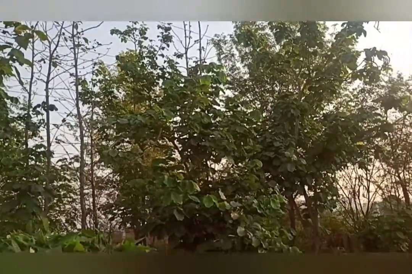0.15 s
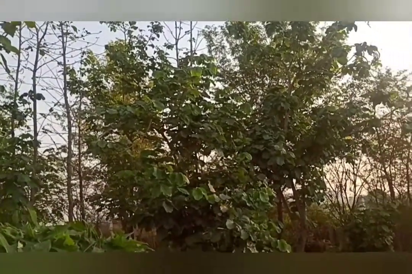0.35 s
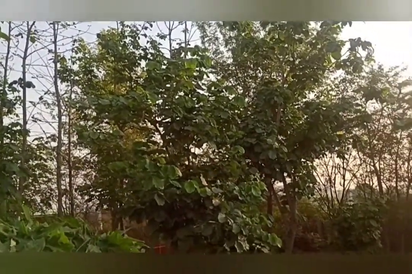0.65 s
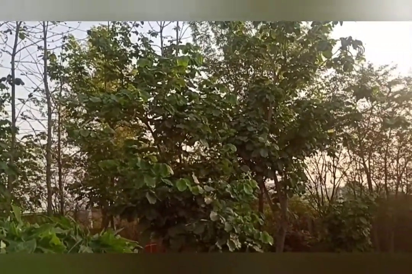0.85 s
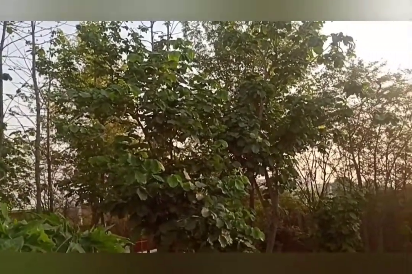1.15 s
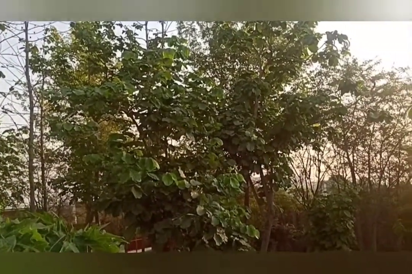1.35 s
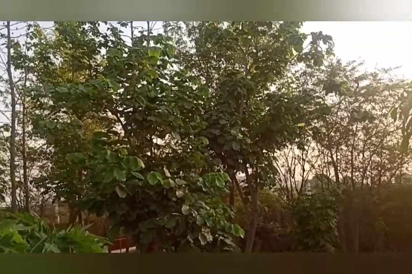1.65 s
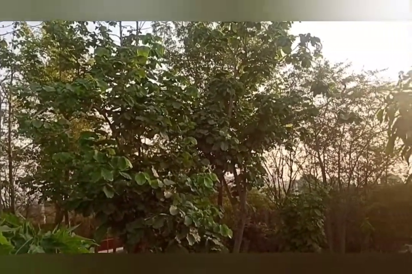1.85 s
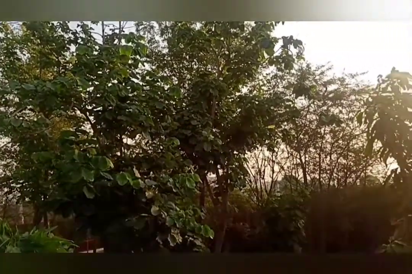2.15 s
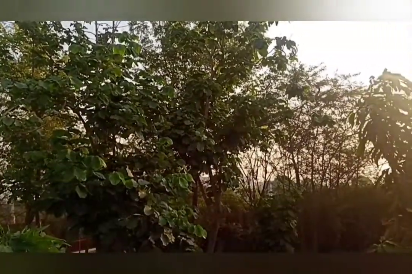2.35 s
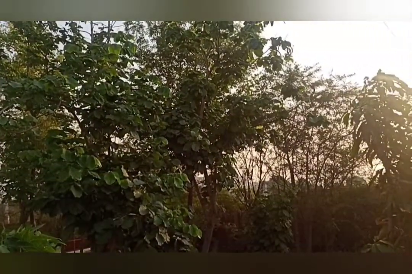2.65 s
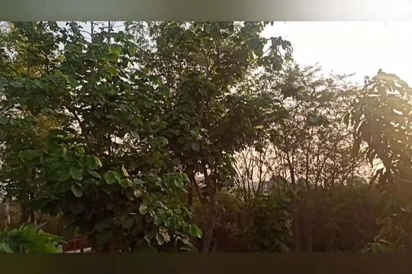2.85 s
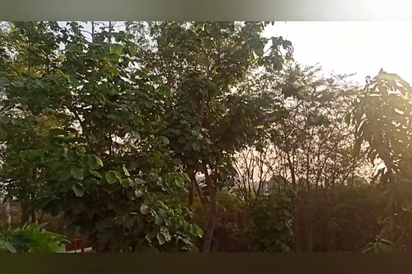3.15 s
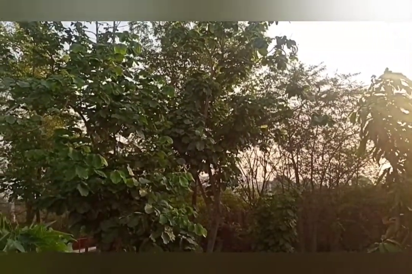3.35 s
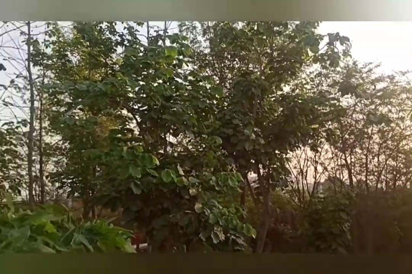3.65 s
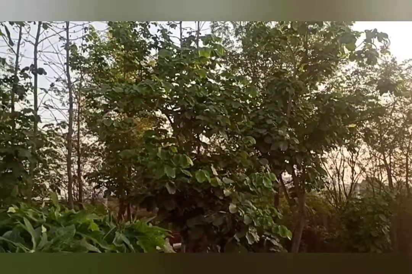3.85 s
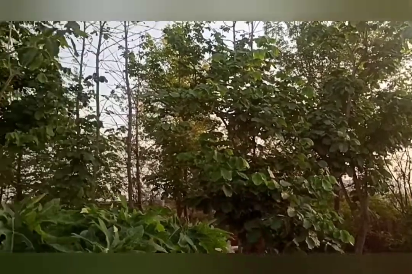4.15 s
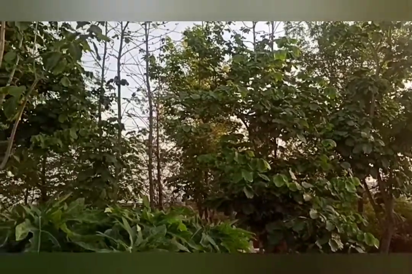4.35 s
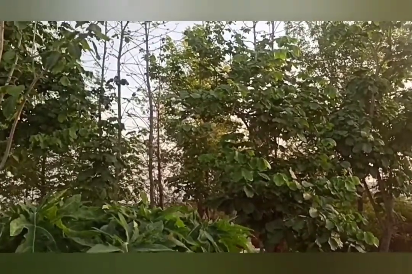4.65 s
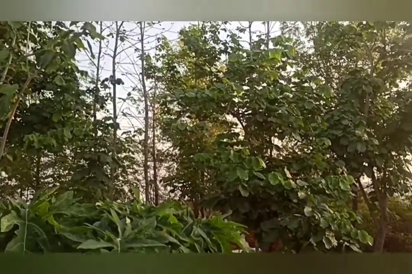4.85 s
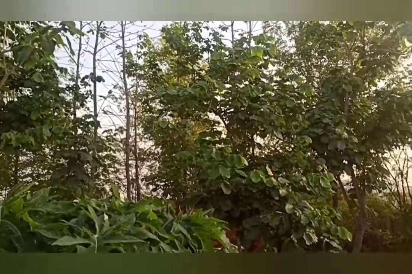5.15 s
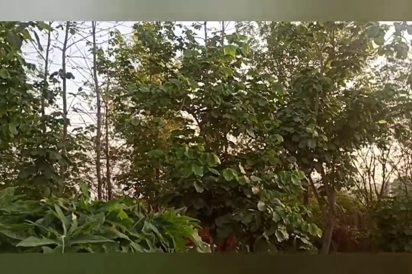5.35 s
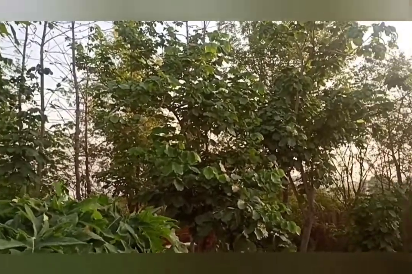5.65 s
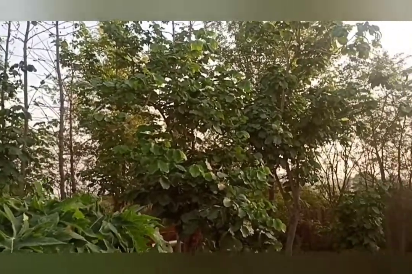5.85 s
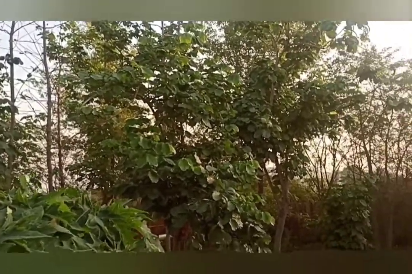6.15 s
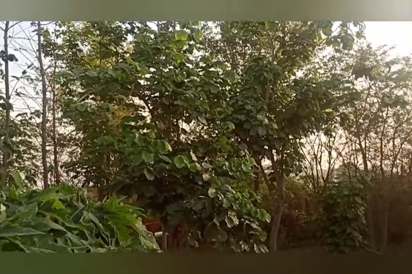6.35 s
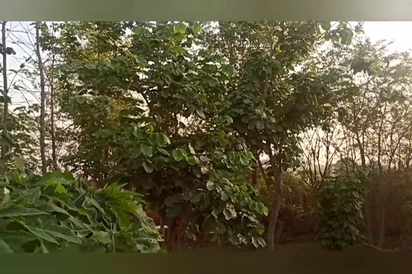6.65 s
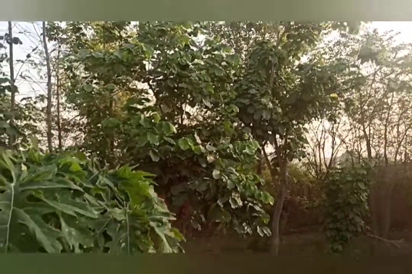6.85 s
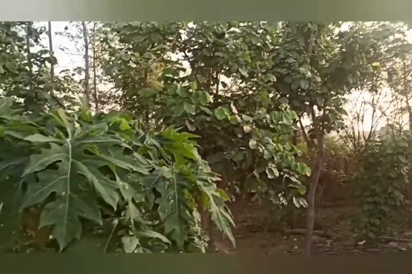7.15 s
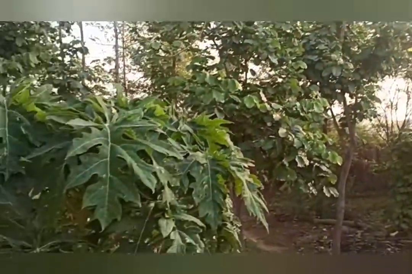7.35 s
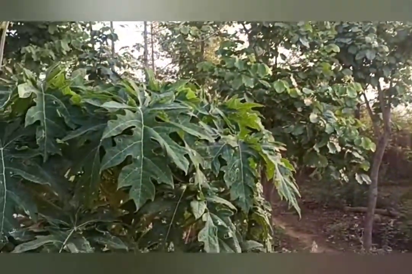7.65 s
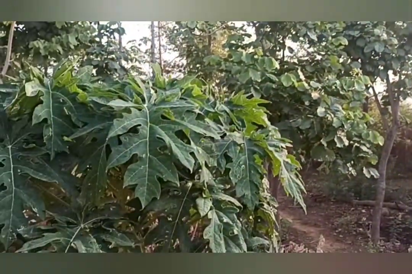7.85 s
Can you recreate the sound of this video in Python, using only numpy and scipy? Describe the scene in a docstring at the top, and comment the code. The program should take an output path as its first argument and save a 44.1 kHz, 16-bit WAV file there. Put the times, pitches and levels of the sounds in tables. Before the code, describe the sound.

A garden among trees is heard in wide stereo, with a light echo on the birds. From the start until about 3 seconds, a flock trades loud, short arched whistles and pips. A lower bird answers with swoops and rolling calls, repeated about three times a second, until nearly 5 seconds. Hoarse birds add raspy, hooked notes from deeper in the trees until about 4 seconds. From 5 to 7.5 seconds it is much quieter: soft far piping, one high falling note at 6 seconds, and distant nasal calls around 6.4 and 7.4 seconds. From 7.6 seconds two louder hoarse calls and a couple of low swoops close the scene. A small bird faintly repeats a thin rising whistle. Light twig clicks come near 1.2 seconds and between 4.4 and 7 seconds. Faint pulsing crickets, a soft rustle and a distant low hum continue underneath.

```python
"""A garden among trees at dusk, heard by two spaced microphones. A loud flock trades arched whistles,
a low-voiced bird answers with rolling calls, hoarse birds call from deeper in the trees and far birds
pipe between them. Each note is a gliding syrinx tone with overtones. Trunks and walls echo the birds
and a few twig clicks, over pulsing crickets and a distant low hum."""
import sys
import numpy as np
from scipy import signal
from scipy.fft import rfft, irfft, next_fast_len
from scipy.io import wavfile
from scipy.ndimage import uniform_filter1d, minimum_filter1d

SR = 44100
rng = np.random.default_rng(int(sys.argv[2]) if len(sys.argv) > 2 else 0)


def dump(signal):
    """Clip the signal to [-1, 1] and save it as 16-bit WAV at the path in sys.argv[1]."""
    limited = np.clip(np.atleast_2d(signal).T, -1, 1)
    pcm = np.round(limited * 32767).astype(np.int16)
    wavfile.write(sys.argv[1], SR, pcm)


N = 352359


def flock():
    """Loud short arches, longer whistles that dip, peak and fall, low pips as after-notes."""
    # Shapes. Each row: share of length, level in dB, pitch ratio.
    arch = [(0, -5.5, .81), (.28, 2.5, .92), (.6, -1, 1.0), (.8, -3, .97), (1, -4.5, .82)]
    dipping_whistle = [(0, -5, 0.93), (.22, 3, 0.82), (.45, -1.5, 1.0), (.72, 1, 0.91), (1, -10, .8)]
    pip = [(0, -7.5, .94), (.5, 1.5, 1.0), (1, -10.5, .91)]
    # Each row: start in s, length in s, level in dB, pan in dB, overtone offset in dB, top pitch in Hz.
    arches = [(-.03, 0.081, -10.5, 5.5, -11, 2256), (.114, 0.046, -6, 4, -22, 2510),
              (.345, 0.053, -8.5, -4.5, -17, 2539), (.59, .058, -9, -2, -17.5, 2612),
              (2.095, 0.041, -14, -7, -12.5, 2333), (2.346, .05, -7.5, 1.5, -21, 2515),
              (2.575, 0.054, -9.5, 0.5, -16.5, 2538), (2.82, 0.056, -11, -4, -16, 2627)]
    dipping_whistles = [(.828, .105, -14.5, -1.5, -16.5, 2354), (1.815, 0.1, -16.5, -3.5, -3, 2579),
                        (3.066, .092, -12, -1.5, -17, 2378)]
    pips = [(.17, 0.034, -13, -8.5, -6.5, 2140), (.225, 0.037, -7, 1.5, -12.5, 2180),
            (.405, 0.04, -8.5, 2, -18, 2201), (.648, 0.039, -12, 0.5, -17, 2180),
            (1.56, 0.039, -16.5, 1.5, -3, 2210), (1.615, 0.04, -12, 1.5, -18.5, 2110),
            (1.835, 0.029, -14, 14, -18.5, 2225), (2.157, .025, -8.5, 3, -17, 2170),
            (2.402, 0.031, -14.5, -3, -9.5, 2130), (2.638, 0.033, -9.5, 2, -17, 2184),
            (2.878, 0.037, -8, 2, -20.5, 2216)]
    partials_db = [0, 5, -2.5, -13.5, -15, -11]
    notes = calls(arch, arches) + calls(dipping_whistle, dipping_whistles) + calls(pip, pips)
    return syrinx(notes, partials_db, waver=.004, flutter_db=3, rasp_rad=.45)


def low_bird():
    """Swoops rise steeply and tip over; rolls hold a lead pitch, dip, climb and fall away."""
    # Each row: share of length, level in dB, pitch ratio.
    swoop = [(0, -17.5, .45), (.15, 1, 0.74), (.3, 3, 0.9), (.55, -6.5, 1), (1, -18, .8)]
    # Each row: share of length, level in dB, weight of lead pitch, weight of top pitch.
    roll = [(0, -14, .9, -0.0028), (.1, -1, 0.99, -0.0069), (.35, -5, 1.09, -.18), (.52, 0.5, 0.017, 0.95),
            (.6, 2.5, 0.015, 1.0), (.76, -2, .2, .7), (1, -11, .55, .19)]
    # Each row: start in s, length in s, level in dB, pan in dB, overtone offset in dB, pitch in Hz (rolls:
    # lead, then top pitch).
    swoops = [(.345, .2, -41, 0.12, -17, 1584), (.805, .09, -25.5, 3, -24, 1800),
              (1.15, 0.067, -21, 1.5, -29, 1743), (1.263, 0.058, -17, .1, -23.5, 2043),
              (1.402, 0.076, -22.5, 0.094, -19, 2000), (3.384, 0.054, -22.5, 4.3, -30, 1750),
              (3.492, 0.0698, -18.5, 0.94, -20.5, 2037), (3.635, .07, -18.5, 2.5, -18, 2006),
              (7.74, 0.064, -35.5, 2.7, -33, 1640), (7.822, .07, -27, 1.54, -21, 1917)]
    rolls = [(-.14, .2, -28, 0, -29, 1510, 1550), (.142, 0.19, -23, 2, -7, 1670, 1693),
             (.922, 0.19, -32.5, 0, -26, 1021, 1394), (1.207, 0.17, -22.5, 2, -11.5, 1339, 1460),
             (1.492, 0.19, -22, 2.5, -7.5, 1440, 1527), (1.517, .2, -30.5, 1, -26, 1006, 1306),
             (1.782, 0.17, -22, 1.5, -29, 1620, 1652), (1.787, 0.2, -22, 0, -11, 1111, 1350),
             (2.062, 0.19, -19.5, .8, -20, 1304, 1464), (2.072, 0.18, -22, 2, -18, 1718, 1707),
             (2.362, .185, -17.5, 1.5, -24, 1430, 1520), (2.372, 0.18, -23, -0.5, -18, 1715, 1685),
             (3.751, 0.22, -31, 3, -24, 992, 1558), (4.016, 0.2, -23, 0, -24, 1112, 1376),
             (4.288, .19, -19.5, .6, -30.5, 1291, 1456), (4.59, .187, -18.5, 1.5, -23.5, 1425, 1517)]
    partials_db = [6.5, -4.5, 0, 0, -7.5, -5.5]
    notes = calls(swoop, swoops) + calls(roll, rolls)
    return syrinx(notes, partials_db, waver=.003, flutter_db=2.2, rasp_rad=.35)


def hoarse_birds():
    """One bird gives hooks (leap, plateau, drop) and level notes; a deeper one rises, then sags."""
    # Shapes. Each row: share of length, level in dB, pitch ratio.
    hook = [(0, -8, .79), (.12, 1, .85), (.25, -6, 1), (.55, -1.5, 0.95), (.8, -16, .94), (1, -14, 0.69)]
    hold = [(0, -3.5, .97), (.35, -3, 0.99), (1, -3.5, 1.01)]
    sag = [(0, -8, .87), (.2, 2, 1.0), (.45, -8, 0.92), (.65, -2.5, .97), (1, -3.5, .91)]
    # Each row: start in s, length in s, level in dB, pan in dB, overtone offset in dB, pitch in Hz.
    hooks = [(.445, 0.045, -10.5, -6.5, -7, 2793), (.69, 0.082, -7.5, 0, -7.5, 2811),
             (.94, 0.098, -9, -1, -7.5, 2835), (1.205, 0.11, -9, -1.5, -8.5, 2880),
             (1.49, .09, -9.5, -2.5, -7.5, 2979), (1.757, 0.1, -16.5, -4, -14, 2990),
             (2.969, 0.061, -14, 1, -15.5, 2934), (3.21, 0.098, -13.5, -.5, -11, 2994),
             (3.465, 0.11, -17, -3, -11.5, 2987), (3.716, 0.1, -15.5, -1.5, -11.5, 2982),
             (3.99, .085, -12.5, -2, -10.5, 2983)]
    holds = [(.49, .1, -13, 1, -12.5, 2383), (.745, .055, -20.5, -3, -15, 2918),
             (1.0, 0.055, -19, -2, -8.5, 2940), (1.45, .05, -12, 7.5, -12.5, 2320),
             (2.227, .062, -19, .1, -7, 2282), (2.495, .08, -22, -9.5, -6, 2348),
             (2.742, 0.0786, -14.5, -2, -9.5, 2458)]
    sags = [(7.599, .115, -13, 4.6, -20.5, 2081), (7.883, .105, -15.5, 5, -19.5, 2220)]
    upper_partials_db = [2, 4, -1, -6, -18.5, -22]
    deep_partials_db = [2.5, 1, -0.5, 2.5, -16, -14]
    notes = calls(hook, hooks) + calls(hold, holds)
    upper = syrinx(notes, upper_partials_db, waver=.006, flutter_db=3.5, rasp_rad=.42)
    deep = syrinx(calls(sag, sags), deep_partials_db, waver=.012, flutter_db=3.5, rasp_rad=.4)
    return upper + deep


def far_piping_and_echoes():
    """Soft far piping and faint late echoes of the low calls; a small bird repeats a rising whistle."""
    # Each row: share of length, level in dB, weights of start, middle and end pitch.
    glide = [(0, -9, 1, 0, 0), (.55, 0, 0, 1, 0), (1, -10, 0, 0, 1)]
    # Each row: start in s, length in s, level in dB, pan in dB, overtone offset in dB,
    # start, middle and end pitch in Hz.
    pipes_and_echoes = [(4.585, 0.047, -52, -6, -23, 2490, 2830, 2740),
                        (4.64, 0.14, -56, -6, -25, 2690, 3060, 2280),
                        (4.96, 0.044, -39, 1, -30, 2050, 2030, 2020),
                        (5.11, .16, -43.5, 3, -30, 1440, 1412, 1120),
                        (5.3, 0.061, -40, 1.5, -27, 1915, 2077, 2054),
                        (5.37, 0.17, -45, 4, -30, 1410, 1416, 1510),
                        (5.389, 0.076, -45, 4, -30, 930, 944, 935),
                        (5.6, 0.2, -45, -4, -35, 1100, 933, 1080),
                        (5.79, 0.13, -38.5, 6, -35, 1080, 1278, 1070),
                        (5.649, 0.26, -48, 14, -26, 1785, 1803, 1777),
                        (5.74, 0.046, -44, -3, -30, 1390, 1424, 1460),
                        (5.961, 0.12, -34, 0, -25, 4770, 4530, 4020),
                        (6.62, 0.147, -47, 9, -28, 1140, 1255, 1216),
                        (6.821, 0.16, -46.5, 7, -26, 1300, 1324, 1190),
                        (7.1, 0.11, -42, 3, -31, 1330, 1386, 1190),
                        (7.34, 0.14, -44.5, 7, -24, 1380, 1466, 1336),
                        (7.35, 0.11, -49, 8, -33, 1150, 1190, 1230),
                        (7.64, 0.044, -40, -3, -30, 975, 950, 950)]
    # Each row: time into the whistle in s, pitch in Hz, level in dB.
    whistle = [(0, 3566, 4.5), (.03, 3646, -2.5), (0.056, 4090, 14), (.09, 4700, 19), (.115, 4520, -20)]
    # Each row: start in s, level in dB.
    repeats = [(0.989, -47.5), (2.27, -46), (2.97, -46.5), (3.66, -48), (4.448, -50.5), (5.245, -50.5),
               (6.041, -49), (6.863, -49), (7.455, -47)]
    pan_db, overtone_db = -3, -30
    whistles = [(pan_db, overtone_db, [(start_s + s, hz, db + shape_db) for s, hz, shape_db in whistle])
                for start_s, db in repeats]
    partials_db = [5, -14]
    notes = calls(glide, pipes_and_echoes) + whistles
    return syrinx(notes, partials_db, waver=.004, flutter_db=2.5, rasp_rad=.1, fade_s=.012)


def nasal_calls():
    """A far nasal note and a rougher squawk, strongest in partials 4 and 5."""
    # Each row: pan in dB, overtone offset in dB, contour of (time in s, pitch in Hz, level in dB).
    note = [(-6, 1.5, [(7.36, 840, -61), (7.43, 918, -45), (7.48, 842, -41), (7.54, 782, -56)])]
    squawk = [(-2.5, -0.5, [(6.315, 860, -49), (6.335, 926, -38), (6.37, 980, -37.5), (6.41, 953, -40),
              (6.45, 907, -45), (6.47, 862, -39), (6.51, 836, -49)])]
    partials_db = [-39, -13, -5, 6, 6, -9]
    smooth = syrinx(note, partials_db, waver=.004, flutter_db=3, rasp_rad=.08)
    rough = syrinx(squawk, partials_db, waver=.025, flutter_db=3, rasp_rad=.3)
    return smooth + rough


def calls(shape, rows):
    """Stretch one shape over each row, giving notes for syrinx. Pan is left minus right."""
    notes = []
    for start_s, length_s, db, pan_db, overtone_db, *pitches_hz in rows:
        contour = [(start_s + share * length_s, np.dot(weights, pitches_hz), db + shape_db)
                   for share, shape_db, *weights in shape]
        notes.append((pan_db, overtone_db, contour))
    return notes


def syrinx(notes, partials_db, waver, flutter_db, rasp_rad, fade_s=.004):
    """Gliding harmonics, fundamental first; pitch wavers, level flutters, uneven cycles add rasp."""
    out = np.zeros((2, N))
    wobble = 1 + waver * walk(150)
    swing_db = flutter_db * walk(90)
    slip_rad = rasp_rad * walk(900)  # spares the fundamental, blurs high overtones most
    for pan_db, overtone_db, contour in notes:
        s, hz, db = np.transpose(contour)
        i = np.arange(max(int((s[0] - fade_s) * SR), 0), min(int((s[-1] + fade_s) * SR), N))
        t = i / SR
        pitch_hz = uniform_filter1d(np.interp(t, s, hz), int(.0041 * SR)) * wobble[i]  # corners rounded
        phase = 2 * np.pi * np.cumsum(pitch_hz) / SR
        tone = np.zeros(len(i))
        for k, partial_db in enumerate(partials_db):
            gain = undb(partial_db + overtone_db * (k > 0))
            in_band = (k + 1) * pitch_hz < .45 * SR
            tone += gain * np.sin((k + 1) * phase + k * slip_rad[i]) * in_band
        fade = np.clip(np.minimum(t - s[0], s[-1] - t) / fade_s + 1, 0, 1) ** 2
        sides_db = np.array([[pan_db], [-pan_db]]) / 2
        out[:, i] += tone * fade * undb(np.interp(t, s, db) + swing_db[i] + sides_db)
    return out


def twigs():
    """Dry snaps and leaf rustles: bright noise bursts that die quickly."""
    # Each row: start in s, level in dB before filtering.
    clicks = [(1.2156, -17), (1.2361, -30), (4.3051, -46), (4.429, -21.5), (5.4455, -40), (5.5194, -33),
              (5.6785, -39), (6.16, -33), (6.6494, -28), (6.849, -17), (7.126, -28)]
    t60_s = .032
    t = np.arange(int(.15 * SR)) / SR
    out = np.zeros((2, N))
    for start_s, db in clicks:
        i = int(start_s * SR)
        out[:, i:i + len(t)] += undb(db - 60 * t / t60_s) * rng.standard_normal((2, len(t)))
    return colour(out, [(800, -32), (2500, -9.5), (4000, 3.5), (15000, -18)])


def crickets():
    """A near cricket chirps in three down-sliding pulses; many far ones blur into a flickering band."""
    # Near cricket. Each row: time in s, level in dB.
    loudness = [(0, -29.5), (2, -45), (3.3, -38.5), (4.4, -40.5), (5.3, -40), (5.7, -33), (6, -33.5),
                (6.3, -52), (7, -74), (8, -60)]
    first_s, period_s, gap_s = .069, .128, .021
    t = np.arange(int(.0146 * SR)) / SR
    pitch_hz = 6750 - 50000 * t
    pulse = np.sin(np.pi * t / t[-1]) ** 2 * np.sin(2 * np.pi * np.cumsum(pitch_hz) / SR)
    chirps_s = np.arange(first_s, N / SR, period_s)
    chirps_db = np.interp(chirps_s, *np.transpose(loudness))
    jitter_db = .6 * rng.standard_normal((len(chirps_s), 3))
    beats = np.zeros(N)
    for k, db in enumerate([0, -3, -10]):  # last pulse first: the chirp swells
        onsets = ((chirps_s - k * gap_s) * SR).astype(int) - len(t) // 2
        beats[onsets] = undb(db + jitter_db[:, k] + chirps_db)
    near = signal.fftconvolve(beats, pulse)[:N]
    chorus = band(hz=6375, width_hz=420) * undb(3.6 * walk(40))
    return near + level(chorus, db=-47.5)


def air():
    """Distant hum, rustle and faint hiss: alike at both microphones in the bass, unrelated above."""
    # Each row: frequency in Hz, relative noise density in dB.
    spectrum = [(18, -61), (30, -19.5), (198, 0.5), (276, -10), (501, -19.5), (1240, -26), (2790, -34.5),
                (4500, -28), (5580, -36), (6440, -25.5), (8380, -42), (9000, -81.5), (11700, -101),
                (19800, -120)]
    alike_below_hz = 450
    mid, side = rng.standard_normal((2, N))
    side = colour(side, [(20, -10), (alike_below_hz / 2, -15), (alike_below_hz * 2, 0), (16000, 0)])
    rustle = level(colour(np.array([mid + side, mid - side]), spectrum), db=-34)
    hum = level(band(hz=211.7, width_hz=22.5)[0], db=-39)
    hiss = level(band(hz=13500, width_hz=4000), db=-68.5)
    return (rustle + hum) * undb(.6 * walk(3)) + hiss


def trees(x, direct_db, scatter_db, scatter_t60_s, tail_db, tail_t60_s):
    """Direct sound, quick scatter off trunks and a long tail from walls, unlike at each microphone."""
    build_s, pole = .01, .35
    t = np.arange(int(1.5 * SR)) / SR
    scatter = level(rng.standard_normal((2, len(t))) * undb(-60 * t / scatter_t60_s), scatter_db)
    tail = level(rng.standard_normal((2, len(t))) * undb(-60 * t / tail_t60_s), tail_db)
    # Leaves and air absorb treble on long paths.
    tail = signal.lfilter([(1 - pole) ** 2], np.convolve([1, -pole], [1, -pole]), tail)
    build = np.clip(t / build_s, 0, 1) ** 2
    response = build * (scatter + tail) / np.sqrt(len(t))
    return undb(direct_db) * x + signal.fftconvolve(x, response, axes=1)[:, :N]


def later_left(x, samples):
    """Extra path to the left microphone; negative arrives there first."""
    return np.array([np.roll(x[0], samples), x[1]])


def undb(db):
    """Decibels to gain."""
    return 10 ** (np.asarray(db) / 20)


def level(x, db):
    """Set the rms level."""
    return x * undb(db) / np.sqrt(np.mean(x ** 2))


def colour(x, points):
    """Filter by (Hz, dB) points on a log axis."""
    hz, db = np.transpose(points)
    size = next_fast_len(N)
    bins_hz = np.maximum(np.arange(size // 2 + 1) * SR / size, 1)
    gain = undb(np.interp(np.log(bins_hz), np.log(hz), db))
    return irfft(rfft(x, size) * gain, size)[..., :N]


def band(hz, width_hz):
    """Band noise, unrelated left and right."""
    sos = signal.butter(2, [hz - width_hz / 2, hz + width_hz / 2], "bandpass", fs=SR, output="sos")
    return signal.sosfilt(sos, rng.standard_normal((2, N)))


def walk(rate_hz):
    """Random steps, smoothed twice; spread near 1."""
    hold = int(SR / rate_hz)
    steps = np.repeat(rng.standard_normal(N // hold + 1), hold)
    return 1.496 * uniform_filter1d(uniform_filter1d(steps, hold), hold)[:N]


def scene():
    """Birds and twigs echo among the trees, over crickets and air."""
    # Each place: direct in dB, scatter in dB, its T60 in s, tail in dB before damping, its T60 in s.
    flock_place = (-4, -1, 0.28, -7.5, 1.25)
    low_place = (-3, -3.5, 0.13, -10.5, 1.0)
    hoarse_place = (-8, -1.5, 0.36, -7.5, 0.89)
    far_place = (-3.5, -3.5, 0.29, -8.5, 1.3)
    loud = later_left(flock(), samples=19)
    low = later_left(low_bird(), samples=-10)
    hoarse = later_left(hoarse_birds(), samples=19)
    far = far_piping_and_echoes() + nasal_calls()
    close = trees(loud, *flock_place) + trees(low, *low_place)
    distant = trees(hoarse, *hoarse_place) + trees(far + twigs(), *far_place)
    return close + distant + crickets() + air()


def record(dry):
    """Overall tone colour, a near-silent band at 9-11 kHz, a peak limiter, a steep low-pass."""
    # Each row: frequency in Hz, gain in dB.
    tone_colour = [(20, -5.5), (40, -14), (75, 0.5), (3000, 0.5), (5000, -7), (5500, -11), (6000, -1),
                   (8700, 1.5), (9200, -33.5), (11200, -27.5), (11600, 0), (13500, 2.5), (16000, -6.5)]
    ceiling, span, cutoff_hz = .96, int(.004 * SR), 15750
    x = colour(dry, tone_colour)
    peak = -minimum_filter1d(-np.abs(x).max(axis=0), 2 * span)
    limited = x * uniform_filter1d(np.minimum(1, ceiling / peak), span)
    return signal.sosfilt(signal.ellip(12, .2, 80, cutoff_hz, fs=SR, output="sos"), limited)


dry = scene()
out = record(dry)
dump(out)
```